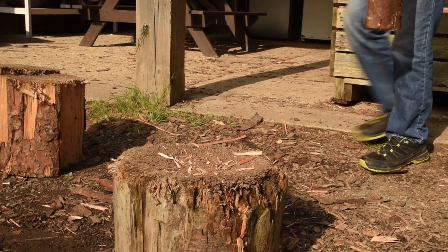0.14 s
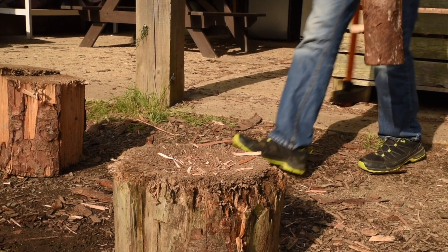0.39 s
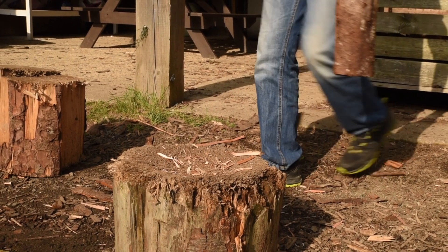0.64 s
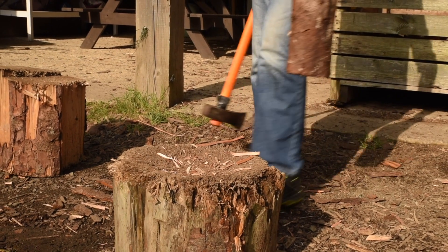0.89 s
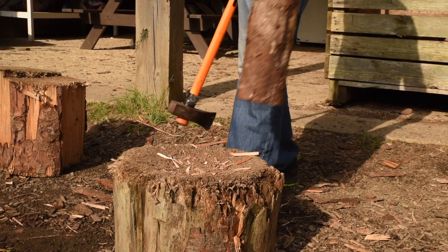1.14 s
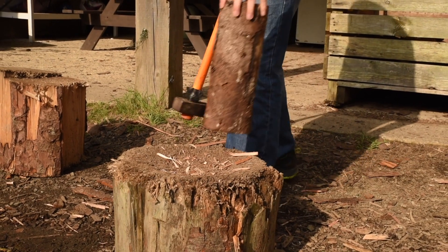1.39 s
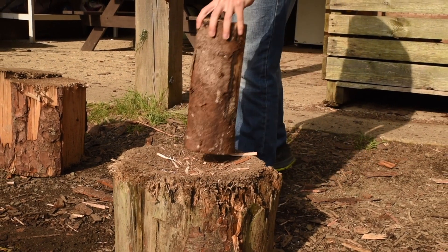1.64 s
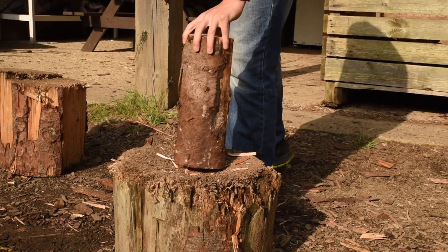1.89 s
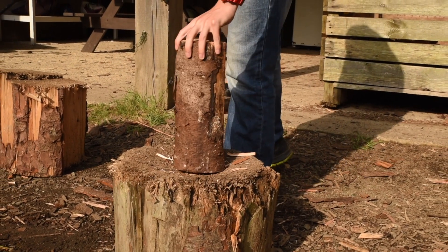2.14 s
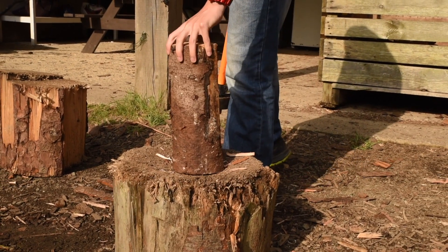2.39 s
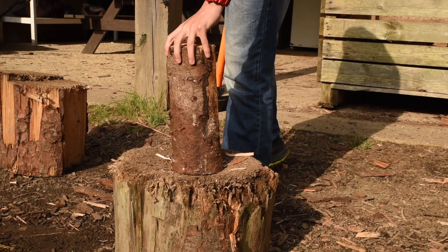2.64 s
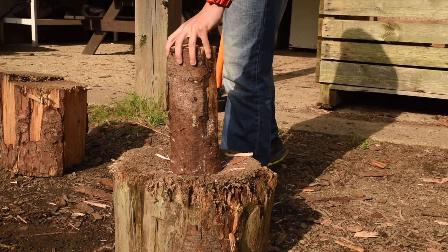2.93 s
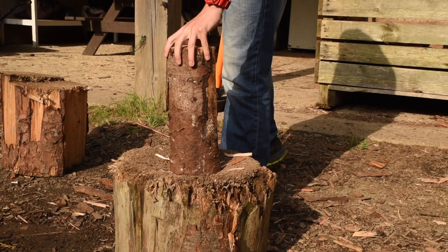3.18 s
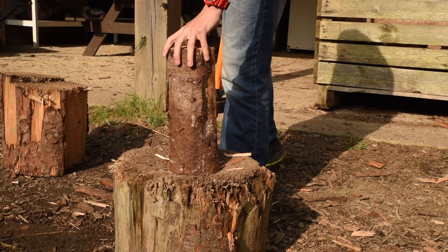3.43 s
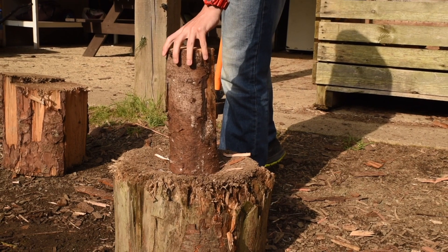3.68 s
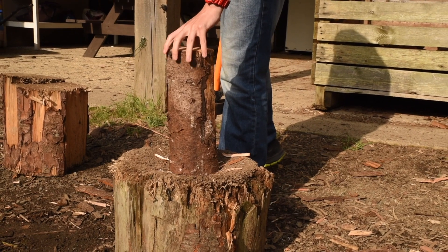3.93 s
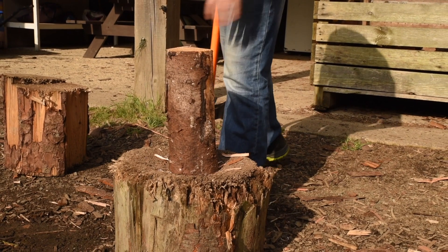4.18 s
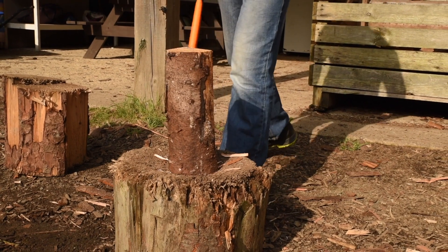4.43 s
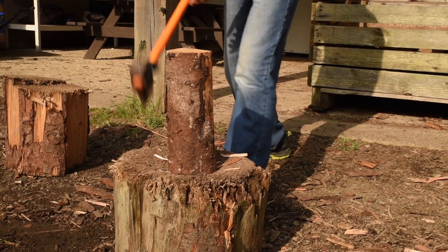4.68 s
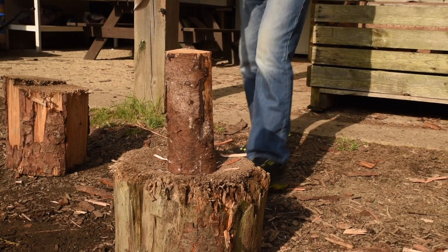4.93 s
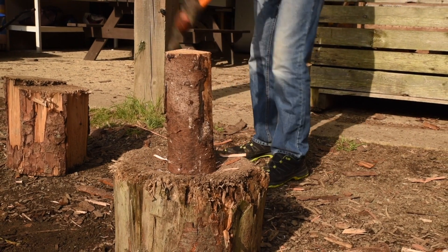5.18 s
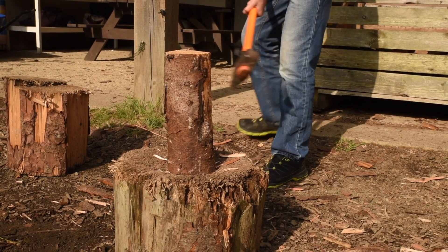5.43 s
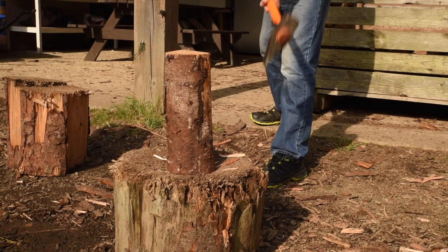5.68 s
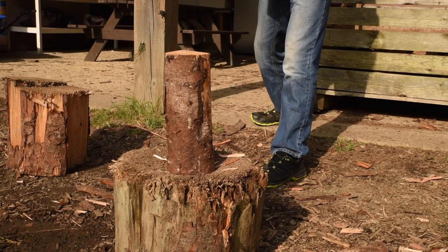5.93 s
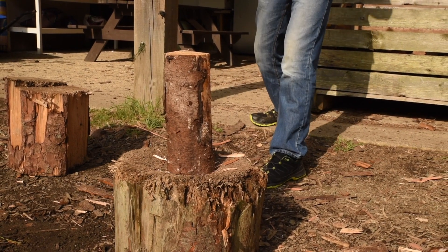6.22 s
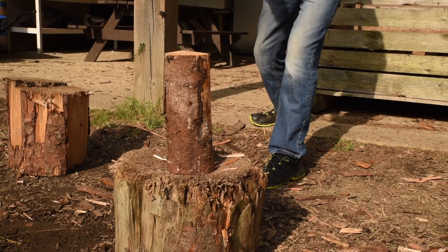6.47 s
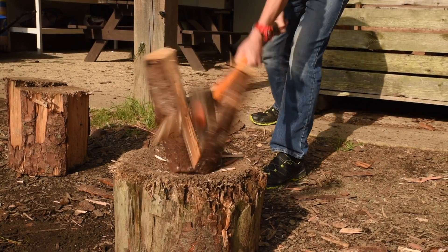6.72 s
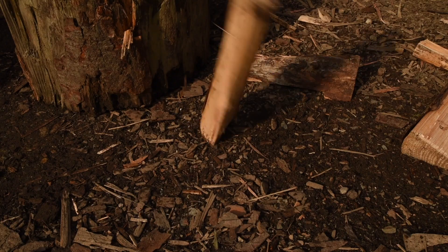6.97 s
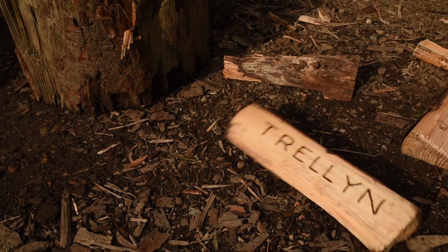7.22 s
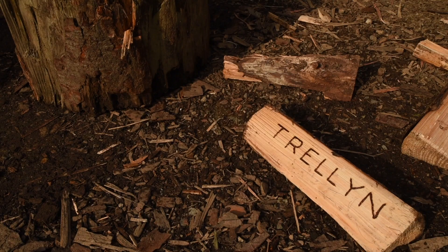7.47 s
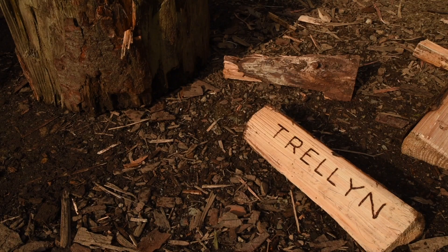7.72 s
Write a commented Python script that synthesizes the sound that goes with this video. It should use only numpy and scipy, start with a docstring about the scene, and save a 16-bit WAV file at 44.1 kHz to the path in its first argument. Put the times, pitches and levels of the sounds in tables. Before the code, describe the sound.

In a quiet open yard, small birds whistle quick, thin, gliding notes, with a soft leaf hiss and low uneven wind on the microphone. Sparse wood-chip crunches and snaps mark footsteps. Near the end an axe splits a log with a loud, close, fibrous crack and low block thump; a billet drops with a hard woody knock and soil thud, tumbles and settles in chips while a nearer bird chirps rapidly.

```python
"""An axe splits a log on a block close to the microphone: bursts of breaking fibres drive wood resonances.
A billet lands and tumbles as decaying modes over a soil thud; shoes and billet crunch and snap wood chips.
Around this yard by a woodshed small birds, near and far, whistle gliding sines that echo off sheds and trees.
Leaf hiss is coloured noise; the breeze buffets the microphone port as low noise of uneven level."""
import sys
import numpy as np
from scipy import signal
from scipy.fft import rfft, irfft
from scipy.io import wavfile
from scipy.ndimage import uniform_filter1d

SR = 44100
rng = np.random.default_rng(int(sys.argv[2]) if len(sys.argv) > 2 else 0)


def elevation(decibels):
    """Turn decibel levels (scalar or array-like) into linear amplitude ratios."""
    levels = np.asarray(decibels, float)
    return 10 ** (levels / 20)


def unload_audio(sound):
    """Save the sound as a 16-bit wav file, at the path given as the first command line argument."""
    columns = np.transpose(np.atleast_2d(sound))
    # keep every value between -1 and 1, then stretch to whole-number steps
    steps = np.round(np.clip(columns, -1, 1) * 32767)
    wavfile.write(sys.argv[1], SR, steps.astype(np.int16))


N = 346096   # length in samples

# Distant air and leaves, a slow swell: time_s, level_db
AIR_SWELL = [(0, -73), (.7, -70.5), (1.9, -66.5), (4.2, -65.5), (6.5, -63.5), (6.9, -65), (7.85, -68)]
# Colour of the leaf hiss before middle and treble are levelled: frequency_hz, density_db (per Hz)
LEAF_COLOUR = [(150, -48), (250, -7), (435, -4.5), (1250, -6), (2460, -10.5), (3540, -6.5), (6720, -23.5),
               (14400, -32.5), (15700, -43)]
TREBLE_DB, TREBLE_FOLLOWS = -82.5, 0.81   # leaf treble level_db at mean air, share of the swell it takes
# Wind at the microphone: time_s, deep_level_db, flutter_db (small eddies against the deep level)
WIND_GUSTS = [(0, -66.5, -0.5), (.5, -62.5, -6.5), (.75, -57, -6.5), (1.3, -59, -10), (1.7, -60, -0.5),
              (2.1, -65, 4.5), (2.75, -66, -1), (3.15, -58.5, -2.5), (3.7, -59, -5.5), (3.88, -57.5, 3),
              (4.1, -61.5, -5), (4.32, -57.5, -7), (4.95, -60, -14.5), (5.2, -51, -6), (5.45, -64, -3),
              (5.6, -54.5, -12), (5.95, -71, 2), (6.01, -55, -16), (6.27, -56, -4.5), (6.47, -60.5, -4),
              (7.62, -58, -5), (7.85, -53.5, -24)]
YARD_T60_S, YARD_DB = 0.29, -12.5   # decay of the yard echoes, birdsong sent into them

# Nearest bird, a two-note phrase, one list a note: time_s (after the phrase begins), pitch_hz, level_db
NEAR_PHRASE = [
    [(0, 3990, -61), (.013, 4355, -48.5), (.022, 4420, -53), (.034, 4540, -82)],
    [(.052, 5850, -69), (.058, 5850, -59.5), (.065, 5570, -64), (.071, 4760, -61), (.080, 4090, -55.5),
     (.093, 3880, -69)],
]
# Its repeats: start_s, first_note_db, second_note_db (both added to the phrase levels)
PHRASE_REPEATS = [(7.036, -2.5, -1.5), (7.171, -7, 4), (7.307, -6.5, 1.5), (7.444, -4, -2.5),
                  (7.585, -6, -1.5), (7.721, -6, -3.5)]
# A far bird flicks up to a peak and down again: start_s, peak_hz, level_db
FAR_FLICKS = [(.64, 6500, -83), (.78, 7600, -83), (.869, 7600, -79), (.938, 7900, -81), (1.024, 7600, -81)]
FLICK_S, FLICK_DROP = .03, .3   # length, share of the pitch lost at both ends
# Notes that drop fast onto a pitch and hold it: start_s, length_s, start_hz, landing_hz, level_db
HOOK_NOTES = [(0.112, 0.024, 6400, 4000, -66), (0.13, 0.041, 9200, 7600, -78), (0.41, .04, 3730, 2700, -69),
              (0.443, 0.11, 6400, 4530, -67.5), (1.103, 0.024, 6850, 3960, -60.5),
              (1.394, 0.029, 6340, 4050, -60.5), (1.689, 0.031, 6600, 4070, -64),
              (1.994, 0.027, 6570, 4020, -62), (2.925, 0.067, 6380, 4490, -62),
              (3.04, 0.033, 4650, 3750, -70), (3.266, 0.016, 6000, 4180, -66),
              (3.511, 0.031, 5230, 4400, -70), (3.587, 0.09, 6120, 4490, -62),
              (3.946, 0.046, 6420, 4010, -61.5), (4.266, 0.066, 6440, 3980, -66),
              (5.074, 0.049, 7400, 6640, -71), (5.205, 0.073, 5320, 4490, -64.5)]
# time constant of the drop, how faint the note starts, fading from its start
HOOK_DROP_S, HOOK_FAINT_DB, HOOK_FADE_DB_PER_S = 0.0055, 14, 78
# Notes that slide evenly: start_s, length_s, start_hz, end_hz, level_db
GLIDE_NOTES = [(.09, .055, 3070, 3340, -75), (.15, .045, 3900, 4100, -73), (0.168, 0.024, 7410, 6990, -76),
               (0.193, 0.047, 3770, 2680, -76), (0.553, 0.018, 4770, 3960, -71),
               (0.747, .035, 4850, 4700, -79), (0.766, .018, 6650, 6450, -76),
               (.825, .015, 7250, 7200, -79), (.84, .025, 5700, 4750, -75), (0.862, .017, 6750, 6700, -76),
               (0.892, 0.07, 5900, 5550, -80), (1.058, .02, 4400, 3480, -72),
               (1.154, 0.037, 4120, 4040, -61.5), (1.201, 0.017, 4740, 3750, -66.5),
               (1.227, 0.02, 3970, 4050, -79), (1.338, 0.042, 4390, 3220, -69),
               (1.444, 0.031, 4060, 4100, -59), (1.728, 0.047, 4100, 4130, -61),
               (2.025, .02, 3950, 3450, -74), (2.053, 0.03, 4080, 4060, -58),
               (2.178, .045, 2080, 1994, -67.5), (2.315, 0.017, 2800, 2740, -65),
               (2.49, 0.12, 2330, 2990, -71.5), (2.758, 0.16, 2980, 2910, -67),
               (3.078, 0.045, 3740, 3520, -66.5), (3.112, .03, 3580, 3200, -67),
               (3.11, .03, 4900, 4600, -78), (3.21, 0.044, 3160, 3130, -66), (3.3, .025, 3920, 4200, -70),
               (3.301, 0.024, 4850, 4520, -74), (3.41, 0.063, 3150, 3380, -68.5),
               (3.5, 0.11, 7400, 7700, -86), (4.235, 0.096, 2640, 3510, -67.5),
               (4.319, .045, 3470, 3500, -67), (4.94, .07, 6000, 5950, -81), (5.16, .028, 6700, 6700, -77),
               (5.41, .035, 4000, 3520, -68), (5.46, .2, 7150, 7300, -88), (5.51, 0.047, 2800, 2780, -69.5),
               (5.55, .03, 4500, 3950, -73), (5.57, .035, 2770, 2770, -70), (5.61, 0.022, 3490, 3530, -63),
               (5.651, 0.1, 2660, 2760, -63.5), (5.895, .055, 4500, 4480, -71),
               (6.23, 0.015, 5700, 5520, -74), (6.241, 0.023, 5460, 5230, -57),
               (6.264, 0.022, 5250, 5090, -67), (6.283, 0.063, 5080, 4920, -69),
               (6.39, .04, 5000, 4980, -88), (6.523, 0.075, 2720, 2700, -59),
               (6.591, 0.039, 2750, 2760, -68), (7.335, 0.13, 6800, 6870, -84)]
GLIDE_ENDS_DB = 7.5   # both ends lie this far under the middle
# Notes that hold a high pitch, then fall: start_s, hold_s, top_hz, bottom_hz, level_db
FALL_NOTES = [(5.524, .012, 6360, 4700, -64), (5.673, 0.011, 6340, 4840, -61),
              (5.771, 0.067, 5870, 5000, -58.5), (5.921, 0.069, 5940, 5130, -57.5)]
FALL_HZ_PER_S, HOLD_UNDER_DB = 45000, 16   # speed of the fall, hold level under its loudest point
# A long slide that lingers on a step halfway down: time_s (after it begins), pitch_hz, relative_db
STAIR_NOTE = [(0, 6800, -5), (.018, 5800, -7), (.036, 5450, -1.5), (.043, 4860, -15), (.052, 4300, -2),
              (.07, 3550, -6.5), (.095, 3150, -14)]
# Where it is sung: start_s, level_db
STAIR_CALLS = [(.782, -64), (2.3, -66.5), (2.617, -68.5), (3.795, -75), (4.577, -67), (4.895, -74)]
# Two high notes arch up and over, one list a note: time_s, pitch_hz, level_db
ARCH_NOTES = [
    [(6.072, 7820, -95), (6.082, 7835, -69), (6.102, 8500, -73), (6.122, 8524, -70), (6.148, 7754, -76),
     (6.168, 7097, -67), (6.176, 6967, -84), (6.182, 7065, -90)],
    [(6.852, 6840, -76), (6.862, 7350, -66), (6.868, 7537, -50.5), (6.888, 7900, -77), (6.898, 8040, -56.5),
     (6.926, 7920, -55.5), (6.938, 7760, -73), (6.958, 7380, -52), (6.965, 7300, -64)],
]
# A thin high warble dips twice and drops away: time_s, pitch_hz, level_db
WARBLE_NOTE = [(0.0, 8460, -80), (0.025, 7620, -81), (0.036, 7700, -77), (0.045, 8400, -77),
               (0.065, 6960, -76), (0.088, 7200, -79), (0.096, 5830, -79)]

# Shoes and billet crunch in the chips: start_s, level_db, centre_hz, length_s
CHIP_CRUNCHES = [(0.56, -64, 1110, 0.13), (4.607, -58, 1512, 0.02), (4.74, -70, 1300, 0.049),
                 (5.696, -53.5, 540, 0.032), (6.974, -60, 3100, 0.048), (7.267, -64, 5000, .005),
                 (7.272, -48.5, 8333, 0.004), (7.273, -56.5, 1500, 0.1), (7.277, -54, 11000, .006),
                 (7.286, -52, 10000, 0.0047), (7.29, -50, 6500, 0.0056), (7.297, -59, 2600, .025),
                 (7.398, -63, 2420, 0.036), (7.464, -61, 1200, 0.14), (7.809, -63, 1160, 0.025)]
# Single chips snap: start_s, peak_db, body_hz
CHIP_SNAPS = [(0.571, -44, 1200), (0.5971, -37.5, 1200), (1.366, -62, 9500), (3.703, -58, 7500),
              (4.763, -41.5, 1490), (6.2216, -33.5, 380), (7.467, -42, 1500), (7.494, -34.5, 920),
              (7.502, -45, 1000)]

# Split billet; soil that takes the weight drives some modes and stills others:
# mode_hz, level_db, t60_s, thud_follow (dB per dB of thud over knock)
BILLET_MODES = [(1250, 14.5, 0.013, 0.43), (1481, 1.5, 0.047, -0.18), (1890, -12, 0.016, 0.3),
                (2365, -9.5, 0.02, -0.5), (2800, -3, 0.0085, 0.17), (3025, -1, 0.016, 0.08),
                (3360, -6, 0.017, 0.1), (4400, -21, 0.015, -.1), (5080, -20, 0.013, -0.37),
                (6080, -22, 0.0086, -0.6)]
# Its knocks: start_s, level_db, hardness_db (per octave), thud_db, free_s (ringing until the soil grips it)
BILLET_KNOCKS = [(6.8095, -35, 4, -45, .003), (6.9650, -46, 6, -70, .002), (6.9665, -31, 12, -24, .05),
                 (7.2735, -31.5, 0, -50, .017), (7.2785, -46, 6, -60, .01), (7.2905, -51, 12, -60, .006),
                 (7.3025, -46, 4, -58, .012), (7.309, -45, 1.5, -60, .03), (7.316, -51, -2, -65, .02),
                 (7.3995, -47, -4, -65, .011), (7.409, -55, 5, -58, .004)]
SOIL_LAG_S = .0014   # the soil gives way a moment after the contact
SAG_FROM_HZ, SAG_TO_HZ, SAG_S, SAG_T60_S = 540, 165, .0028, .038   # the thud sinks in pitch as the soil packs
# A faint ring of the packed soil, one row: pitch_hz, level_db (against the thud), t60_s
PACKED_SOIL = (565, -10, .035)

# The wood cracks under the edge: start_s, level_db, t60_s, brightness_db (drive of high against other modes)
WOOD_CRACKS = [(6.7395, -32, .03, -6), (6.742, -26, .03, -3), (6.7445, -25, .02, 0),
               (6.7515, -27, .022, -1), (6.757, -39, .02, 1), (6.772, -44, .03, 3), (6.785, -47, .02, 3),
               (6.8005, -52, .012, 14)]
# Fibres keep tearing: time_s, level_db
FIBRE_TEARING = [(6.742, -44), (6.78, -49.5), (6.82, -51.5), (6.841, -60), (6.844, -91)]
# Modes of log and block: mode_hz, width_hz, relative_db
LOG_MODES = [(141, 41, 8), (343, 280, -7.5), (536, 15, 10.5), (663, 116, 9.5), (1400, 1000, 0),
             (1970, 460, -29), (2980, 640, 0), (3850, 780, -3), (5560, 4700, -8), (6960, 8000, -15.5),
             (10800, 2100, -16)]
BLOW_S, BLOW_DB = 6.7415, -6   # the axe head lands with its weight
FIBRES_LOW_DB = -5.5   # gain of the breaking fibres into the low modes


def times():
    """Seconds of every sample."""
    return np.arange(N) / SR


def in_time(rows):
    """Columns of a curve, sample by sample."""
    s, *columns = np.transpose(rows)
    return [np.interp(times(), s, column) for column in columns]


def rms_one(x):
    """Scales to rms 1."""
    return x / np.sqrt(np.mean(x ** 2) + 1e-20)


def band(x, low_hz, high_hz, order=2):
    """Butterworth band-pass."""
    return signal.sosfilt(signal.butter(order, [low_hz, high_hz], "band", fs=SR, output="sos"), x)


def drift(rate_hz):
    """Smooth random wander of rms 1: noise through two equal low-pass poles at rate_hz."""
    step = 40   # samples between drawn points
    r = np.exp(-2 * np.pi * rate_hz * step / SR)
    white = rng.standard_normal(N // step + 2002)
    slow = signal.lfilter([1], [1, -2 * r, r * r], white)[2000:]   # skip the filter's settling
    return np.interp(np.arange(N) / step, np.arange(len(slow)), rms_one(slow))


def ring(clicks, hz, t60):
    """A unit click sets a decaying sine of height 1 ringing."""
    r, w = elevation(-60 / (t60 * SR)), 2 * np.pi * hz / SR
    return signal.lfilter([0, np.sin(w)], [1, -2 * r * np.cos(w), r * r], clicks + 1e-18)


def resonate(x, hz, width_hz):
    """A two-pole resonance of gain 1 on top."""
    r = np.exp(-np.pi * width_hz / SR)
    poles = [1, -2 * r * np.cos(2 * np.pi * hz / SR), r * r]
    return signal.lfilter([(1 - r * r) / 2, 0, (r * r - 1) / 2], poles, x)


def grains(per_s, spread_db):
    """Dense random clicks of uneven size and either sign, rms 1."""
    size_db = spread_db * np.minimum(rng.exponential(1, N), 5)
    sizes = elevation(size_db) * rng.choice([-1, 1], N)
    return rms_one(sizes * (rng.random(N) < per_s / SR))


def add(out, s, sound):
    """Mixes a short sound in at a time."""
    i = round(s * SR)
    out[i:i + len(sound)] += sound[:N - i]


def air():
    """Distant leaf hiss: the treble swells less than the middle and flickers on its own."""
    middle_db, = in_time(AIR_SWELL)
    treble_db = TREBLE_DB + TREBLE_FOLLOWS * (middle_db - middle_db.mean())
    hz, db = np.transpose(LEAF_COLOUR)
    f = np.fft.rfftfreq(N, 1 / SR)
    colour = elevation(np.interp(np.log(f + 1), np.log(hz), db))
    hiss = irfft(rfft(rng.standard_normal(N)) * colour, N)
    low = signal.sosfiltfilt(signal.butter(1, 5000, fs=SR, output="sos"), hiss)
    middle = low / np.std(band(hiss, 500, 2500, order=4))
    treble = (hiss - low) / np.std(band(hiss, 9000, 15000, order=4))
    swelling_middle = elevation(middle_db + .6 * drift(2)) * middle
    return swelling_middle + elevation(treble_db + 1.0 * drift(12)) * treble


def wind():
    """Lumpy pressure on the microphone port: deep noise, and the flutter of small eddies above it."""
    deep_db, eddies_db = in_time(WIND_GUSTS)
    flutter_db = deep_db + eddies_db
    white = rng.standard_normal((2, N))
    deep = rms_one(band(white[0], 28.8, 96.4)) * elevation(deep_db + 2.6 * drift(15.4))
    flutter = signal.lfilter([1], [1, -np.exp(-2 * np.pi * 110 / SR)], band(white[1], 75.0, 292))
    return deep + rms_one(flutter) * elevation(flutter_db + 2.25 * drift(3.6))


def yard(x):
    """Scattered echoes from sheds and trees: band-limited noise that dies away."""
    t = np.arange(SR // 2) / SR
    noise = band(rng.standard_normal(len(t)), 500, 10000, order=1)
    tail = noise * elevation(-60 * t / YARD_T60_S) * (t > .006)   # no echo in the first 6 ms
    return signal.fftconvolve(x, tail / np.sqrt(np.sum(tail ** 2)))[:N]


def whistle(note, edge_s=0.0015):
    """A bird's voice as one gliding sine with soft ends."""
    s, hz, db = np.transpose(note)
    t = np.arange(s[0], s[-1] + edge_s, 1 / SR)
    fade = np.clip(np.minimum(t - t[0], t[-1] - t) / edge_s, 0, 1)
    pitch_hz = uniform_filter1d(np.interp(t, s, hz), size=130)
    level = np.sqrt(2) * elevation(np.interp(t, s, db))   # rms to sine peak
    return fade * level * np.sin(2 * np.pi * np.cumsum(pitch_hz) / SR)


def hook(s, length, start_hz, landing_hz, db):
    """The pitch settles exponentially; the voice comes up as it lands, and fades steadily."""
    t = np.arange(0, length, .001)
    above = np.exp(-t / HOOK_DROP_S)   # share of the drop still to go
    pitch_hz = landing_hz + (start_hz - landing_hz) * above
    level_db = db - HOOK_FAINT_DB * above ** 0.77 - HOOK_FADE_DB_PER_S * t
    return np.transpose([s + t, pitch_hz, level_db])


def glide(s, length, start_hz, end_hz, db):
    """An even slide, level in the middle and fainter at both ends."""
    u = np.linspace(0, 1, 21)
    level_db = db - GLIDE_ENDS_DB * (2 * u - 1) ** 4
    return np.transpose([s + u * length, start_hz + (end_hz - start_hz) * u, level_db])


def fall(s, hold, top_hz, bottom_hz, db):
    """A faint hold, then a steady fall that is loudest halfway."""
    length = (top_hz - bottom_hz) / FALL_HZ_PER_S
    return [(s, top_hz, db - HOLD_UNDER_DB),
            (s + hold, top_hz, db - HOLD_UNDER_DB),
            (s + hold + length / 2, (top_hz + bottom_hz) / 2, db),
            (s + hold + length, bottom_hz, db - 7.0)]


def flick(hz, db):
    """A quick rise to a peak pitch and back down."""
    low_hz = hz * (1 - FLICK_DROP)
    return [(0, low_hz, db), (FLICK_S / 2, hz, db), (FLICK_S, low_hz, db)]


def birds():
    """Whistles waver in level as the air moves, the far ones slightly more, the nearest bird faster."""
    far, near = np.zeros((2, N))
    notes = [hook(*row) for row in HOOK_NOTES]
    notes += [glide(*row) for row in GLIDE_NOTES]
    notes += [fall(*row) for row in FALL_NOTES]
    for note in notes + ARCH_NOTES + [WARBLE_NOTE]:
        add(far, note[0][0], whistle(note))
    for s, db in STAIR_CALLS:
        add(far, s, elevation(db) * whistle(STAIR_NOTE))
    for s, hz, db in FAR_FLICKS:
        add(far, s, whistle(flick(hz, db)))
    for s, *levels_db in PHRASE_REPEATS:
        for note, db in zip(NEAR_PHRASE, levels_db):
            add(near, s + note[0][0], elevation(db) * whistle(note))
    return far * elevation(2.4 * drift(55)) + near * elevation(2.2 * drift(70))


def chips():
    """Wood chips underfoot: crunches are clumps of grains, snaps are lone clicks with a small body."""
    out, grit = np.zeros(N), grains(2500, spread_db=4.0)
    for s, db, hz, length in CHIP_CRUNCHES:
        i, size = round(s * SR), round(length * SR)
        clump = rms_one(band(grit[i:i + size], hz / 2.06, hz * 1.31))
        swell = np.sin(np.pi * np.linspace(0, 1, size) ** 0.29)   # quick rise, slow fall
        add(out, s, elevation(db) * swell * clump)
    click = signal.unit_impulse(400)
    for s, db, hz in CHIP_SNAPS:
        body = ring(click, hz, 0.0039)
        tick = elevation(-11.5) * band(ring(click, 7700, 0.00074), 5500, 12000)
        add(out, s, -elevation(db) * (body + tick))
    return out


def soil_thud(t):
    """Soil under a knock: a sine that sinks in pitch as it packs, and a faint steady ring."""
    cycles = SAG_TO_HZ * t + (SAG_FROM_HZ - SAG_TO_HZ) * SAG_S * (1 - np.exp(-t / SAG_S))
    sag = elevation(-60 * t / SAG_T60_S) * np.sin(2 * np.pi * cycles)
    ring_hz, ring_db, ring_t60 = PACKED_SOIL
    packed = elevation(ring_db - 60 * t / ring_t60) * np.sin(2 * np.pi * ring_hz * t)
    return np.minimum(t / 0.00074, 1) * (sag + packed)


def billet():
    """A hard contact favours high modes and cracks; each knock weighs and tunes the modes a little differently."""
    out, t = np.zeros(N), np.arange(SR // 10) / SR
    hz, mode_db, t60, follows = np.transpose(BILLET_MODES)[:, :, None]
    chance = rng.standard_normal((len(BILLET_KNOCKS), 2, len(BILLET_MODES), 1))
    splinter = band(rng.standard_normal((len(BILLET_KNOCKS), len(t))), 3500, 12700, order=1)
    thud = soil_thud(t)
    for knock, (luck, detune), noise in zip(BILLET_KNOCKS, chance, splinter):
        s, db, hardness, thud_db, free_s = knock
        tilt_db = np.minimum(hardness * np.log2(hz / hz[1]), 13)
        level_db = db + mode_db + tilt_db + follows * (thud_db - db) + 1.5 * luck
        contact = np.minimum(t * hz / 2.8, 1)   # each mode builds up over a few cycles
        tone = np.sin(2 * np.pi * hz * (1 + .003 * detune) * t)
        modes = contact * elevation(level_db - 60 * t / t60) * tone
        grip = elevation(-3000 * np.maximum(t - free_s, 0))   # the soil stills the wood
        crack = elevation(db - 23 + 2.07 * hardness - 4700 * t) * noise
        add(out, s, grip * modes.sum(axis=0) + crack)
        add(out, s + SOIL_LAG_S, elevation(thud_db) * thud)
    return out


def split():
    """Bursts of breaking fibres drive log and block resonances; the axe's blow also drives the low ones."""
    i, size = round(WOOD_CRACKS[0][0] * SR), SR // 5
    t = times()[i:i + size]
    dull = elevation(np.interp(t, *np.transpose(FIBRE_TEARING), left=-200))
    bright = dull * elevation(-5.0 - 28 * (t - t[0]))   # the tearing dulls as the halves part
    for s, db, t60, bright_db in WOOD_CRACKS:
        burst = (t >= s) * elevation(db - 60 * np.maximum(t - s, 0) / t60)
        dull = np.hypot(dull, burst)
        bright = np.hypot(bright, burst * elevation(bright_db))
    blow = elevation(BLOW_DB) * signal.unit_impulse(size, round(BLOW_S * SR) - i)
    fibres = grains(8000, spread_db=3.5)
    out = np.zeros(N)
    for k, (hz, width_hz, db) in enumerate(LOG_MODES):
        own_fibres = fibres[k // 2 * size:][:size]   # each pair of modes hears its own fibres
        drive = own_fibres * (bright if hz > 4500 else dull)
        if hz < 800:   # the low modes also take the blow of the axe head
            drive = elevation(FIBRES_LOW_DB) * resonate(drive, hz, 2 * width_hz) + blow
        sign = (-1) ** k
        add(out, t[0], sign * elevation(db + 13.5) * resonate(drive, hz, width_hz))
    return out


def scene():
    """The birds echo across the yard; the wood is close to the microphone and nearly dry."""
    song = birds()
    wood = split() + billet() + chips()
    echoes = yard(elevation(YARD_DB) * song + elevation(-23.0) * wood)
    return (song + wood + echoes + air() + wind())[None]


def low_pass(x):
    """Removes everything above the highest recorded frequency."""
    return signal.sosfilt(signal.butter(12, 16460, fs=SR, output="sos"), x)


def record(dry):
    """Takes the finished mix of the yard to its final sound."""
    return low_pass(dry)


dry = scene()
out = record(dry)
unload_audio(out)
```